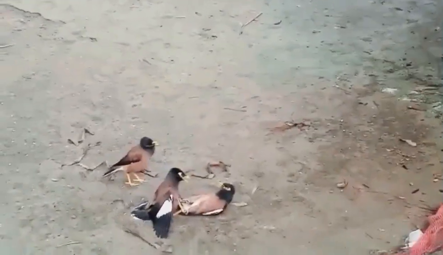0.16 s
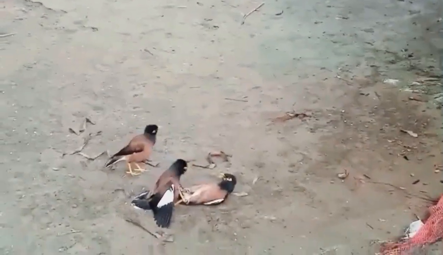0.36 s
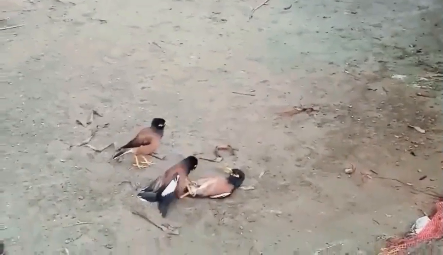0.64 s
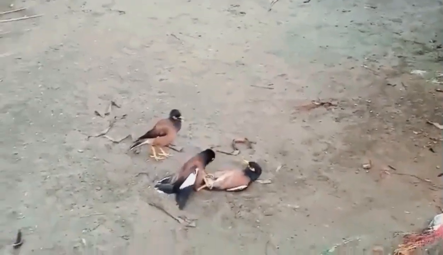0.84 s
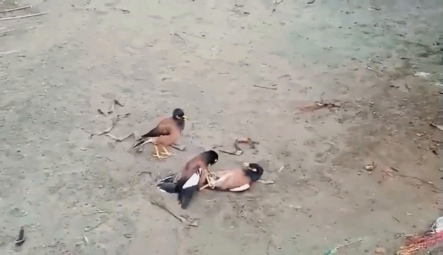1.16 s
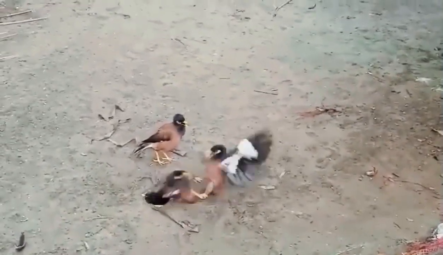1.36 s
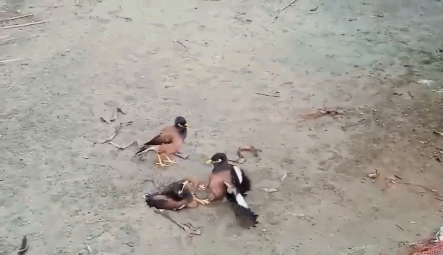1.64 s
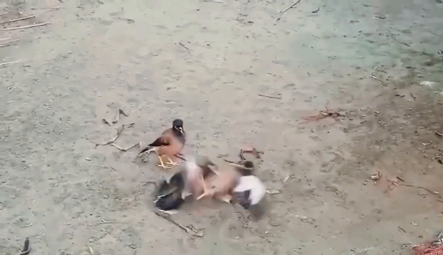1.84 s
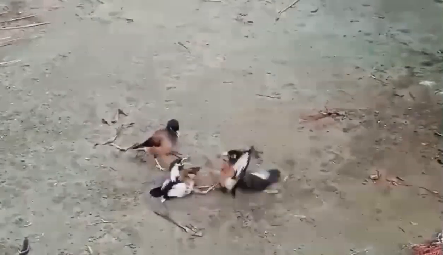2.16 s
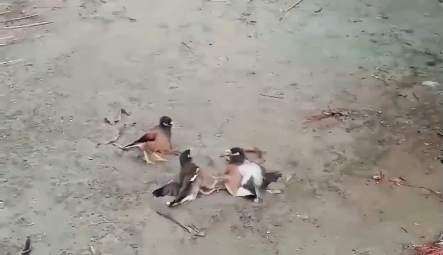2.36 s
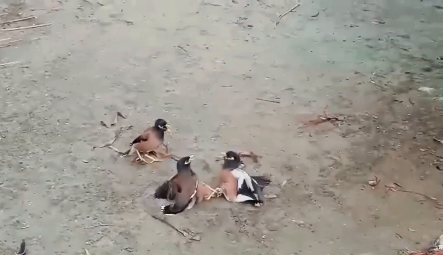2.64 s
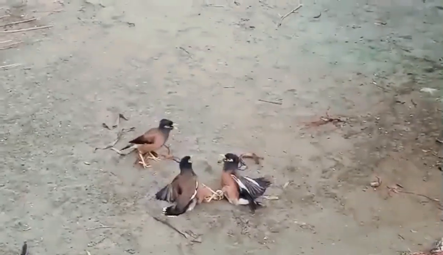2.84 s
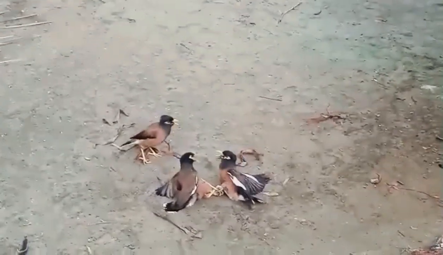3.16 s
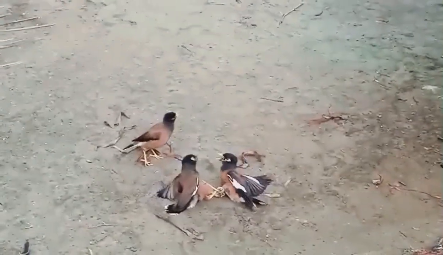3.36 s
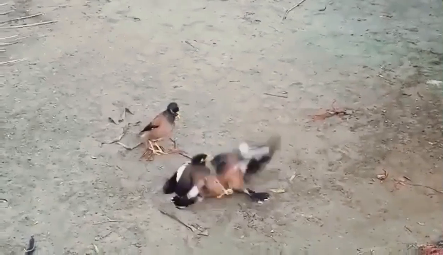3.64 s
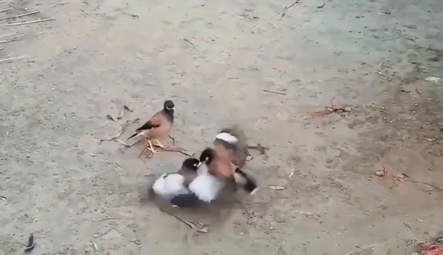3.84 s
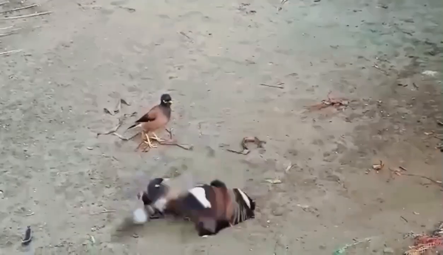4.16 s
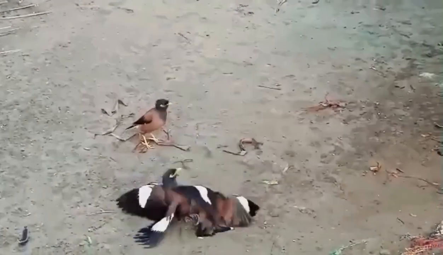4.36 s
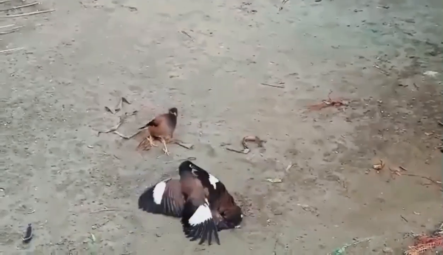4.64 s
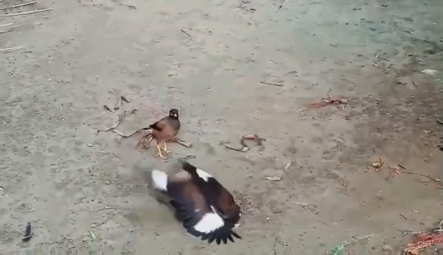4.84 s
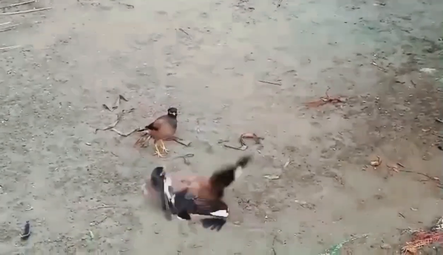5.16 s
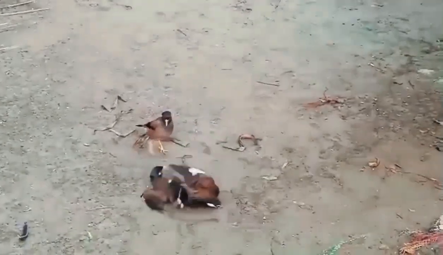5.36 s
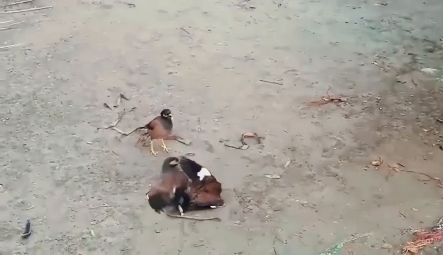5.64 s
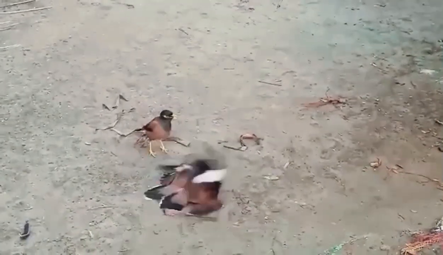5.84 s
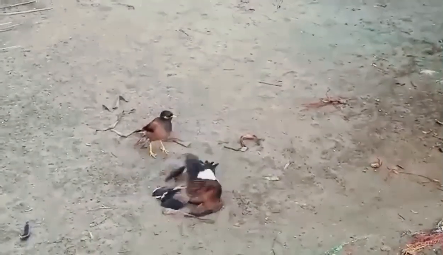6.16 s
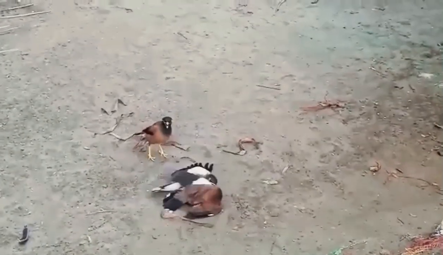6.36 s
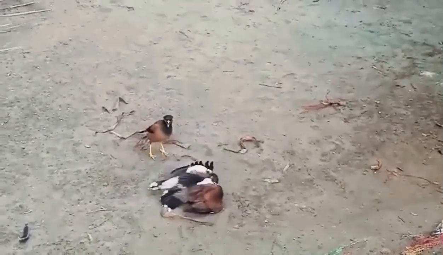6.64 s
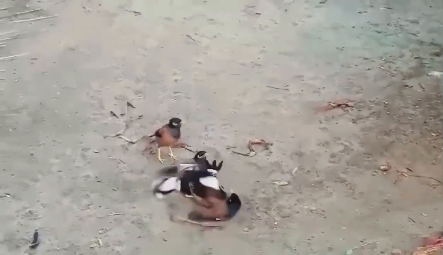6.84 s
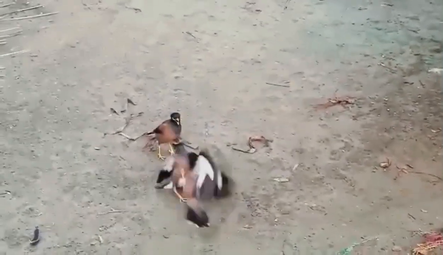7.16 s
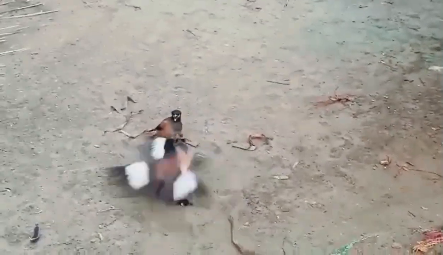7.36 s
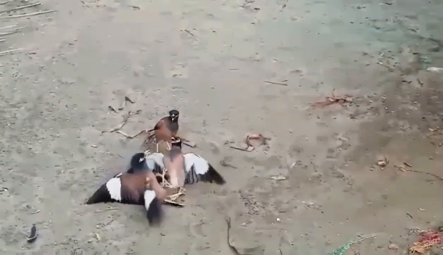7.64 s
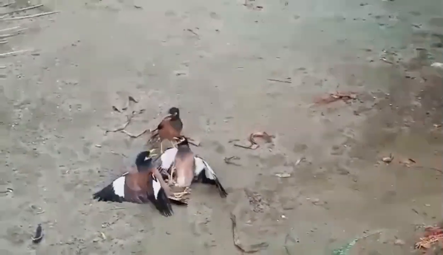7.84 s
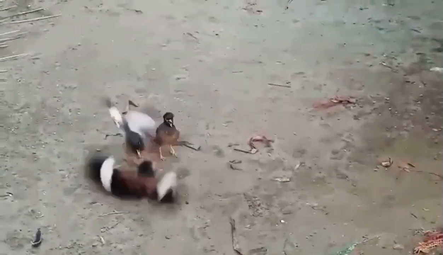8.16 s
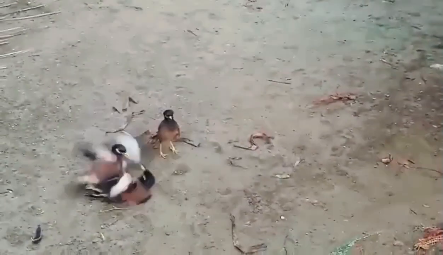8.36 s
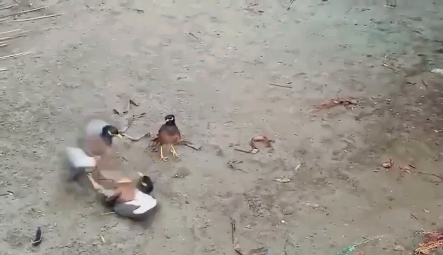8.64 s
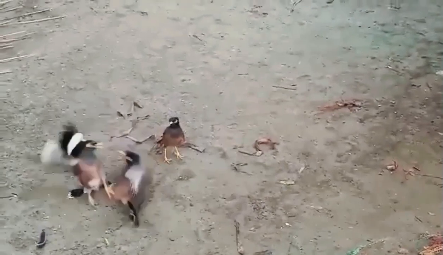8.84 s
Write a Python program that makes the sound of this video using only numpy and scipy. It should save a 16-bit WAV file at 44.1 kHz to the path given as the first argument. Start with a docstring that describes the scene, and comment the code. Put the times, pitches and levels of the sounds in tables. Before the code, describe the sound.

Several mynas squabble in a quiet open yard, their calls carrying a short echo over a very faint hush and hum. For the first two seconds they give brief high whistles, low buzzes and a quick chirping phrase repeated about six times a second. From about 2.2 seconds the chatter flares into loud, overlapping hoarse screeches, chirps and rattles, dying away just before 4 seconds. A lull of about a second follows. From around 5 seconds scattered softer whistles return, with one longer throbbing note near 5.5 seconds and more light chirps after it. A second dense, harsh flare-up of sliding whistles and rattles runs from about 6.7 to 8.3 seconds, loudest near 7.3 and 7.9. After a short pause, a few last high whistles sound near 8.8 seconds.

```python
"""Three mynas scuffle in a quiet, humming yard, each singing with a near-sine voice plus overtones.
They open with whistles, low buzzes and a repeated four-note phrase, then flare into hoarse screeches,
chirps and rattles from 2 to 4 s. After a lull come scattered whistles and one long throbbing note.
A second flare-up runs from about 6.7 to 8.3 s, and a few last whistles follow near 8.8 s.
Throughout, the calls bounce off bare ground and scatter back from trees and walls."""
import sys
import numpy as np
from scipy import signal
from scipy.fft import rfft, irfft, next_fast_len
from scipy.io import wavfile
from scipy.ndimage import uniform_filter1d

SR = 44100
rng = np.random.default_rng(int(sys.argv[2]) if len(sys.argv) > 2 else 0)


def to_wav(s):
    """Save 16-bit WAV."""
    ch = np.atleast_2d(s).T  # columns
    pcm = np.round(np.clip(ch, -1, 1) * 32767)  # PCM
    wavfile.write(sys.argv[1], SR, pcm.astype(np.int16))


N = 397341
ALONG = np.linspace(0, 1, 17)  # points along a note, start to end


def undb(db):
    return 10 ** (np.asarray(db) / 20)


def level(x, db):
    return x * undb(db) / np.sqrt(np.mean(x ** 2))


def wobble(rate, count):
    """Smooth random motion, about rate new values a second, spread near 1."""
    hold = int(SR / rate)
    steps = np.repeat(rng.standard_normal(count // hold + 1), hold)
    return 1.5 * uniform_filter1d(uniform_filter1d(steps, hold), hold)[:count]


def band(hz, width, count=N):
    """Noise in a bell-shaped band, rms 1."""
    size = next_fast_len(count)
    f = np.arange(size // 2 + 1) * SR / size
    bell = np.exp(-.5 * ((f - hz) / width) ** 2)
    return level(irfft(rfft(rng.standard_normal(size)) * bell, size), 0)[:count]


# The tone of the distant hush. Each row: frequency in Hz, relative band level in dB.
HUSH_BANDS = [(30, -104), (60, -88), (100, -80), (200, -85), (600, -81.5), (1200, -78.5), (2500, -78),
              (3300, -91), (4500, -96), (8000, -101)]
# Faint wavering hums. Each row: pitch in Hz, width in Hz, level in dB.
HUMS = [(86, 6.2, -76.5), (585.5, 91, -78), (1131, 44, -78)]
# How the low rumble swells and fades. Each row: time in seconds, gain in dB.
RUMBLE_SWELLS = [(0, -58), (0.401, -81), (1.9, -73), (2.15, -61.5), (2.397, -82), (5, -78.5), (5.701, -67.5),
                 (9.01, -69.5)]
def yard():
    """The outdoor bed: a hush in drifting half-octave bands, hums and low swells."""
    hz, db = np.transpose(HUSH_BANDS)
    hush = 0
    for centre in 30 * 2 ** np.arange(0, 9.1, .5):
        band_db = np.interp(np.log(centre), np.log(hz), db)
        hush += undb(band_db + wobble(6, N)) * band(centre, centre / 6)
    hums = sum(undb(hum_db) * band(pitch, width / 2) for pitch, width, hum_db in HUMS)
    swell = undb(np.interp(np.arange(N) / SR, *np.transpose(RUMBLE_SWELLS)))
    rumble = swell * (band(93, 22) + undb(-6.5) * band(260, 160))
    return level(hush, db=-68) + hums + rumble


# The echo tail. Each row: band centre in Hz, seconds to die by 60 dB, weight in dB before a treble tilt.
ECHO_BANDS = [(1000, .42, -2.5), (2010, .4, -4), (2778, 0.35, -5.5), (4410, 0.55, -10), (8000, 0.2, -8)]
GROUND_S, GROUND_DB = .0037, -6.5
def scatter(calls):
    """The direct sound, a bounce off bare earth and dense echoes from trees and walls."""
    t = np.arange(SR) / SR
    onset = np.clip(t / .0031, 0, 1)
    response = 0
    for hz, t60, db in ECHO_BANDS:
        tail = band(hz, hz / 4, SR) * np.exp(-np.log(1000) * t / t60) * onset
        response += undb(db) * tail / np.sqrt(np.sum(tail ** 2)) * np.sqrt(hz / SR)
    response[int(GROUND_S * SR)] += undb(GROUND_DB)
    response[0] += 1
    return signal.fftconvolve(calls, response)[:N]


# The heat of the fight. Each row: time in seconds, hoarseness in dB.
HOARSENESS = [(2.6, 1.2), (3.6, 3.4), (3.9, 3.4), (5.2, 1.5), (6.6, 2.0), (6.8, 3.6), (7.3, 3.6),
              (8.05, 3.6), (8.2, 1.5)]
def hoarseness(t):
    """How rough the voices are: it drives rasp, breath and flutter."""
    return np.interp(t, *np.transpose(HOARSENESS))


# Breath bands. Each row: centre in Hz, width in Hz, dB against the voice before hoarseness lifts it.
HISS_BANDS = [(5500, 600, -39), (9000, 1000, -47), (12500, 1300, -51)]
def bill_hiss(song):
    """Air hissing past the bill follows the loudness of the calls."""
    envelope = uniform_filter1d(np.abs(song), size=SR // 100)
    air = sum(undb(db + 1.2 * wobble(28, N)) * band(hz, width) for hz, width, db in HISS_BANDS)
    return envelope * undb(hoarseness(np.arange(N) / SR)) * air


# The resonance of the open bill. Each row: pitch in Hz, gain in dB.
BILL_RESPONSE = [(1500, -11.5), (2200, -3.5), (3000, 0.5), (3500, 2.5), (4200, -19.5), (4800, -25),
                 (5500, -25)]
def through_bill(times, hz, db):
    """Shape a note's level: the open bill favours pitches near 3 kHz."""
    bill_hz, bill_db = np.transpose(BILL_RESPONSE)
    return np.c_[times, hz, db + np.interp(np.log(hz), np.log(bill_hz), bill_db)]


def glide(t, times, hz):
    """A cubic pitch curve that turns round flat at every peak and dip."""
    slope = np.diff(hz) / np.diff(times)
    agree = slope[:-1] * slope[1:]
    inner = np.where(agree > 0, 2 * agree / (slope[:-1] + slope[1:] + 1e-9), 0)
    tangent = np.r_[slope[0], inner, slope[-1]]
    k = np.clip(np.searchsorted(times, t) - 1, 0, len(times) - 2)
    span = np.diff(times)[k]
    u = (t - times[k]) / span
    bend = (1 - u) * (tangent[k] - slope[k]) - u * (tangent[k + 1] - slope[k])
    return hz[k] + span * u * (slope[k] + (1 - u) * bend)


# One patch per kind of call. Each entry: drive of overtones 2 to 4 in dB, pulses per second, pitch fall
# per pulse as a share, pulse depth from 0 to 1, decay in pulses, base rasp as a share of pitch,
# base breath in dB.
VOICES = {"whistle": ((-25, -23, -28), 70, 0, 0, 1, .005, -27), "chirp": ((-2, -18, -34),
          70, 0, 0, 1, .01, -20), "phrase": ((-19, -30, -34), 70, 0, 0, 1, .004, -28),
          "buzz": ((10, -4, -12), 84, .11, .7, .55, .014, -18), "screech": ((-20, -22, -32),
          140, .2, .95, .45, .012, -18), "scream": ((-21, -23, -32), 140, .07, .92, .6, .008, -24),
          "throb": ((-22, -26, -32), 70, .05, .97, .7, .008, -24), "trill": ((-27, -29, -34),
          73, .36, .95, .45, .008, -24), "rattle": ((-26, -28, -34), 72, .3, .8, .55, .018, -18)}
THROAT_HZ, THROAT_DB = 6300, -10  # the windpipe weakens overtones above this pitch
CROAK_RATIO = .7
def syrinx(out, note, kind):
    """Sing a note through its points (seconds, Hz, dB), chopped and roughened by its patch."""
    overtones_db, rate, fall, depth, decay, rasp, breath_db = VOICES[kind]
    times, hz, db = np.transpose(note)
    start = max(int(times[0] * SR), 0)
    t = np.arange(start, min(int(times[-1] * SR), N)) / SR
    count = len(t)
    hoarse_db = hoarseness(t)
    pulse = np.cumsum(rate * (1 + .07 * wobble(40, count)) / SR) % 1
    pitch = glide(t, times, hz) * (1 - fall * (.2 + np.tanh((pulse - .35) / .19) / 2))
    pitch *= 1 + rasp * undb(hoarse_db) * wobble(500, count)
    phase = 2 * np.pi * np.cumsum(pitch) / SR
    # turbulent air smears the note and its overtones
    tone = np.sin(phase) * (1 + undb(breath_db + hoarse_db) * wobble(2500, count))
    for harmonic, drive_db in enumerate(overtones_db, 2):
        above = np.clip(harmonic * pitch / THROAT_HZ - 1, 0, .1) / .1
        gain = undb(drive_db + THROAT_DB * above) * (harmonic * pitch < SR / 2.2)
        smear = .5 + .062 * hoarse_db * wobble(1500, count)
        tone += gain * smear * np.sin(harmonic * phase)
    # each pulse opens fast and dies away
    puff = np.minimum(pulse / .12, 1) * np.exp(-pulse / decay) * np.minimum((1 - pulse) / .15, 1)
    tone *= 1 - depth + depth * level(puff, 0)
    # the other side of the syrinx croaks along, more so in hoarse and chopped notes
    croak = np.sin(CROAK_RATIO * phase + wobble(400, count)) * (1 - depth * np.cos(np.pi * pulse) ** 2)
    tone += undb(-25 + 7.4 * depth + .21 * hoarse_db) * croak
    flutter_db = hoarse_db * (1 - 1.6 * np.abs(wobble(110, count)))  # the level flickers up and down
    fades = np.clip(np.minimum((t - t[0]) / .007, (t[-1] - t) / .005), 0, 1)
    out[start:start + count] += np.sqrt(2) * undb(np.interp(t, times, db) + flutter_db) * fades * tone


def settle(t, from_hz, to_hz, lag_s):
    """Close in on a pitch, quickly at first, reaching it at the last point."""
    return from_hz + (to_hz - from_hz) * np.expm1(-t / lag_s) / np.expm1(-t[-1] / lag_s)


# Each row: start and length in seconds, first and last pitch in Hz, level in dB before the bill.
SLURS = [(0.0, 0.04, 2556, 2546, -33.5), (1.85, 0.055, 2790, 2750, -48), (0.136, 0.1, 3040, 3074, -39.5),
         (0.226, 0.067, 2940, 1924, -36), (0.316, 0.085, 3090, 3212, -30), (0.397, 0.12, 3226, 2550, -38),
         (0.833, 0.032, 4940, 4310, -28.5), (7.835, 0.073, 3460, 4860, -20.5),
         (1.528, 0.035, 4500, 4150, -33), (2.393, 0.058, 3960, 4216, -25), (2.923, 0.015, 2970, 4600, -30),
         (3.354, 0.071, 2980, 2756, -37.5), (5.329, 0.079, 1720, 1535, -33.5),
         (3.404, 0.024, 2900, 4350, -27), (7.302, 0.0095, 3050, 4430, -26),
         (7.642, 0.03, 2724, 2642, -27.5), (3.662, 0.044, 2705, 2010, -39),
         (3.753, 0.032, 2740, 2515, -32.5), (3.672, 0.027, 3200, 3050, -51),
         (7.318, 0.013, 3060, 4240, -22.5), (2.379, 0.083, 1860, 2083, -43), (2.53, 0.021, 1730, 2010, -44),
         (6.523, 0.063, 2840, 2445, -45), (3.888, 0.032, 2390, 1590, -49), (5.072, 0.048, 1120, 1183, -51),
         (5.153, 0.13, 830, 867, -52.5), (5.269, 0.021, 3850, 3346, -40.5), (7.368, 0.025, 3920, 2794, -34),
         (5.581, 0.089, 1300, 1330, -39), (5.804, 0.02, 3644, 3646, -41), (5.86, 0.075, 2904, 2780, -37),
         (6.167, 0.073, 3030, 2270, -41.5), (6.311, 0.041, 3060, 4360, -43), (6.66, 0.059, 3400, 3770, -46),
         (6.727, 0.058, 2524, 2800, -41.5), (6.854, 0.1, 2920, 2158, -34.5), (7.04, .045, 2296, 2174, -40),
         (7.09, 0.023, 3100, 2120, -35), (7.399, 0.093, 2643, 2826, -31.5),
         (7.449, 0.025, 2400, 1567, -30.5), (7.612, 0.051, 3240, 4410, -30),
         (7.713, 0.016, 2150, 1553, -27.5), (7.885, 0.052, 3436, 2493, -32.5),
         (8.222, 0.066, 3140, 2704, -36), (8.886, 0.035, 3360, 3480, -48)]
def slurred_whistles(out, fade_db_per_s=-69):
    """Whistles that slide into a pitch as they fade, faster going up than down."""
    for at, length, from_hz, to_hz, db in SLURS:
        t = length * ALONG
        hz = settle(t, from_hz, to_hz, lag_s=.016 if to_hz < from_hz else .008)
        syrinx(out, through_bill(at + t, hz, db + fade_db_per_s * t), "whistle")


# Each row: start and length in seconds, first, held and last pitch in Hz, level in dB before the bill.
DROPS = [(2.515, 0.078, 3414, 3146, 3030, -29), (2.744, 0.088, 2625, 2723, 1780, -31.5),
         (2.88, 0.097, 3370, 3070, 2784, -28), (2.984, 0.043, 2246, 2256, 1970, -32.5),
         (3.197, 0.083, 2780, 2620, 2120, -32), (3.256, .095, 3700, 3080, 2820, -31),
         (3.347, 0.079, 2706, 2195, 1916, -34), (3.777, 0.076, 3140, 2816, 2627, -39),
         (5.396, 0.071, 3930, 2800, 2715, -43), (6.812, 0.054, 3580, 3616, 2780, -37.5),
         (7.113, 0.1, 2804, 2640, 1557, -32), (7.68, 0.034, 2674, 2470, 2186, -29.5),
         (7.925, 0.087, 2797, 2938, 1704, -34), (8.121, 0.05, 2794, 2840, 2410, -37.5)]
def dropping_whistles(out, sag_hz_per_s=-800, drop_s=.032):
    """Whistles that open softly, settle, sag and fall away at the end."""
    for at, length, from_hz, held_hz, last_hz, db in DROPS:
        t = length * ALONG
        held = settle(t, from_hz, held_hz, lag_s=.0089) + sag_hz_per_s * t
        falling = np.clip(1 - (length - t) / drop_s, 0, 1)
        hz = held + (last_hz - held) * falling
        opening_db = -5 * np.exp(-t / .0077)
        syrinx(out, through_bill(at + t, hz, db + opening_db), "whistle")


# Clean whistles, high fast-chopped screeches and narrow purring screams.
# Each row: start and length in seconds, first, middle and last pitch in Hz, level in dB before the bill.
ARCHES = [(0.074, 0.055, 3220, 4750, 3250, -40.5), (0.277, 0.019, 3210, 4150, 2920, -36),
          (0.292, 0.019, 2960, 4090, 3100, -39), (1.505, 0.027, 3430, 3920, 3010, -36.5),
          (2.335, 0.034, 3500, 4650, 3170, -23.5), (2.943, 0.053, 3120, 4670, 2840, -26),
          (3.414, 0.05, 3190, 4600, 2830, -24), (3.732, 0.05, 3490, 3960, 2870, -38),
          (5.205, 0.053, 2070, 3170, 2190, -55), (5.25, 0.023, 2400, 3190, 2700, -49),
          (5.202, 0.051, 4320, 4740, 3280, -35.5), (5.252, 0.036, 3300, 4730, 3750, -38),
          (5.446, 0.12, 1930, 1732, 1154, -39.5), (5.828, 0.035, 3720, 3960, 2930, -36.5),
          (6.293, 0.035, 4080, 2500, 2920, -50.5), (6.734, 0.055, 4120, 4800, 3260, -56),
          (6.701, 0.03, 3740, 3250, 2420, -42.5), (7.014, 0.028, 4430, 2297, 2940, -43),
          (7.33, 0.048, 3160, 4700, 2820, -23), (7.582, 0.024, 3170, 4300, 3300, -36.5),
          (7.86, 0.046, 3160, 4140, 3530, -25), (7.87, 0.043, 4350, 4970, 3090, -23),
          (7.399, .035, 3130, 4020, 3480, -33.5), (8.071, 0.026, 3300, 3610, 2770, -46),
          (8.183, 0.036, 3610, 3986, 3270, -34), (8.807, 0.079, 1630, 2825, 2230, -46.5),
          (8.808, 0.059, 3640, 5140, 4250, -28.5), (8.856, 0.017, 5000, 4650, 3330, -26.5)]
SCREECHES = [(1.172, 0.11, 4100, 4200, 4250, -30), (2.452, 0.044, 4540, 4670, 4840, -23.5),
             (2.791, 0.088, 4500, 4500, 4780, -26), (3.182, 0.079, 4690, 4650, 4990, -25.5)]
SCREAMS = [(0.865, 0.087, 5550, 5740, 5560, -35), (2.42, 0.096, 3950, 3960, 3544, -27),
           (2.773, .11, 3860, 3960, 3455, -33), (3.167, 0.11, 3890, 3930, 3680, -33)]
def arched_calls(out, dwell=1.7):
    """Calls whose pitch bows up or down and lingers at mid-note."""
    bow = np.tanh(dwell * np.sin(np.pi * ALONG)) / np.tanh(dwell)
    for kind, rows in [("whistle", ARCHES), ("screech", SCREECHES), ("scream", SCREAMS)]:
        for at, length, from_hz, middle_hz, to_hz, db in rows:
            straight = from_hz + (to_hz - from_hz) * ALONG
            hz = straight + (middle_hz - (from_hz + to_hz) / 2) * bow
            syrinx(out, through_bill(at + length * ALONG, hz, db), kind)


# Low overtone-rich chirps, low purring buzzes, rattles of falling chips and trills of wider chips.
# Each row: start and length in seconds, first and last pitch in Hz, level in dB and, except for
# the buzzes, swell in dB.
CHIRPS = [(2.287, 0.037, 1752, 987, -57.5, 18), (2.705, 0.035, 1196, 1040, -60.5, 6),
          (2.812, 0.03, 1117, 698, -59, -3), (3.002, 0.051, 1156, 820, -61, 1),
          (3.157, 0.051, 1114, 1072, -60, -10), (3.268, 0.025, 1126, 720, -58, 2),
          (3.478, 0.049, 1166, 774, -60, -2), (3.671, 0.034, 1100, 1050, -60.5, -6),
          (3.778, 0.031, 1004, 580, -54.5, -7.5), (5.8, 0.019, 1900, 1690, -52, -13),
          (6.105, 0.046, 1756, 1608, -51.5, 7), (6.142, 0.017, 1670, 1970, -45, 20),
          (6.477, 0.036, 1285, 1447, -60.5, 25), (6.667, 0.019, 1456, 860, -51, -1),
          (6.706, 0.024, 913, 2220, -54, 7), (6.752, 0.025, 1610, 2280, -53, -2),
          (6.726, 0.022, 2267, 1670, -47, 6), (6.781, 0.032, 2144, 1510, -56.5, 28),
          (7.079, 0.03, 1660, 1000, -54, 22), (7.301, 0.036, 1466, 2410, -40, 8),
          (7.895, 0.059, 1136, 807, -59, 4), (8.078, 0.056, 1176, 885, -60, -28.5)]
BUZZES = [(0.141, 0.1, 734, 760, -63.5), (0.396, 0.25, 1297, 1677, -54), (0.877, 0.11, 1456, 1278, -58),
          (1.123, 0.15, 1326, 1454, -58), (1.506, 0.05, 1486, 1508, -60.5), (1.625, 0.058, 2640, 951, -55),
          (1.86, 0.29, 1290, 1807, -56)]
RATTLES = [(0.0, 0.11, 2995, 2635, -46, -16), (2.099, 0.082, 3610, 3420, -48, 16),
           (2.26, 0.047, 3286, 2090, -39.5, 0.5), (2.597, 0.18, 2790, 2090, -46, -12),
           (2.996, 0.12, 3163, 2405, -45, -21.5), (3.077, 0.11, 2527, 2520, -47, 18.5),
           (3.47, 0.08, 3226, 2480, -44, -21.5), (3.528, .1, 2460, 2710, -49, 10.5),
           (3.69, .065, 2810, 2750, -42, 7.5), (5.655, .09, 2993, 2564, -40.5, -11),
           (4.893, 0.073, 2900, 2710, -72, -7.5), (7.118, .19, 3240, 2864, -46.5, 6),
           (7.386, 0.05, 3673, 3130, -38, -27), (7.589, 0.059, 2397, 2192, -39, 2.5),
           (7.801, 0.087, 2654, 2485, -41, -4), (7.915, 0.06, 3444, 3195, -41.5, -22.5),
           (8.063, 0.071, 3020, 2493, -42.5, -6.5)]
TRILLS = [(0.861, .085, 3820, 3650, -49, 6), (1.557, 0.076, 3710, 3680, -40.5, 1),
          (2.185, 0.08, 3397, 3396, -37.5, 8), (2.379, 0.071, 3370, 2970, -38.5, -1),
          (3.802, 0.08, 3380, 3280, -56, -9), (6.431, 0.15, 3084, 3050, -51, 2)]
def sliding_calls(out, buzz_swell_db=13):
    """Calls that ride a straight glide, swelling or fading evenly."""
    buzzes = [(*row, buzz_swell_db) for row in BUZZES]
    for kind, rows in [("chirp", CHIRPS), ("buzz", buzzes), ("rattle", RATTLES), ("trill", TRILLS)]:
        for at, length, from_hz, to_hz, db, swell_db in rows:
            note = [(at, from_hz, db - swell_db / 2), (at + length, to_hz, db + swell_db / 2)]
            syrinx(out, note, kind)


# Each row: time in seconds, pitch in Hz, level in dB.
THROB_POINTS = [(5.47, 3802, -48.5), (5.572, 3740, -40), (5.59, 3290, -32.5), (5.658, 3282, -34),
                (5.691, 2500, -44), (5.75, 2350, -48.5)]
def throbbing_note(out):
    """One long, deeply pulsed note that steps down twice."""
    syrinx(out, THROB_POINTS, "throb")


# Four notes, each a list of points. Each point: seconds from the beat, pitch in Hz, relative level in dB.
PHRASE = [
    [(-.013, 1864, -5), (-.002, 2453, 4), (.005, 2526, 13.5), (.017, 2050, 5.5)],
    [(.018, 3260, -4), (.025, 2660, 7), (.032, 2610, 6.5), (.038, 3760, 21)],
    [(.035, 1756, -6), (.045, 2300, 13), (.056, 1860, -5.5)],
    [(.057, 3555, 15.5), (.07, 2916, 10.5), (.085, 2700, 16.5)],
]
# Where the phrase lands. Each row: time in seconds, level in dB.
PHRASE_BEATS = [(0.687, -55.5), (0.8622, -51), (1.035, -55.5), (1.217, -56.5), (1.399, -53), (1.5754, -52),
                (1.7619, -52), (1.9358, -51.5)]
def repeated_phrase(out):
    """A quick figure sung on every beat; the last one breaks off a note early."""
    for at, db in PHRASE_BEATS:
        for note in PHRASE if at < PHRASE_BEATS[-1][0] else PHRASE[:-1]:
            syrinx(out, np.array(note) + [at, 0, db], "phrase")


def mynas():
    """The birds chatter over each other, with breath on top."""
    song = np.zeros(N)
    slurred_whistles(song)
    dropping_whistles(song)
    arched_calls(song)
    sliding_calls(song)
    throbbing_note(song)
    repeated_phrase(song)
    return song + bill_hiss(song)


def scene():
    """The echoing squabble over the yard bed, in mono."""
    return (scatter(mynas()) + yard())[None]


TOP_HZ = 14200
def record(dry):
    """A steep low-pass takes off the very top."""
    return signal.sosfilt(signal.ellip(8, .2, 50, TOP_HZ, fs=SR, output="sos"), dry)


dry = scene()
out = record(dry)
to_wav(out)
```